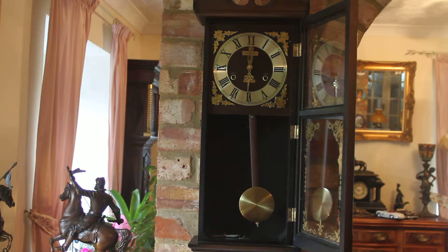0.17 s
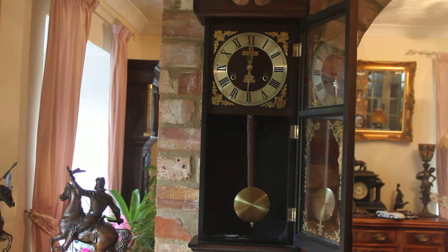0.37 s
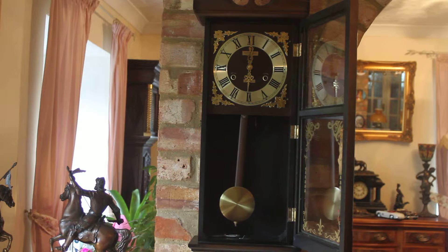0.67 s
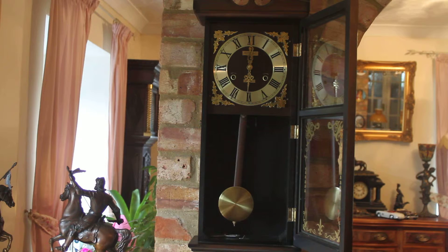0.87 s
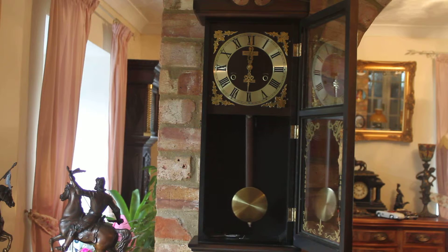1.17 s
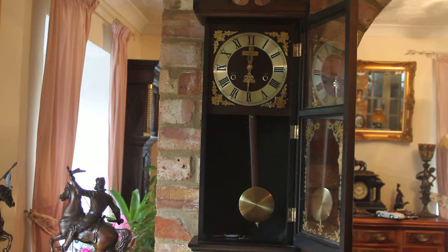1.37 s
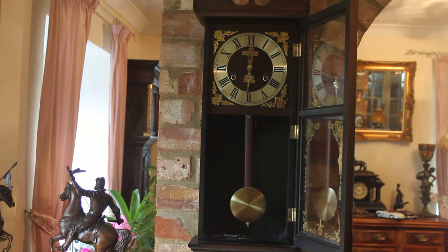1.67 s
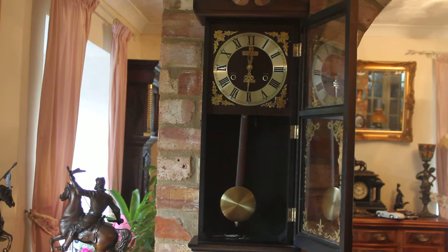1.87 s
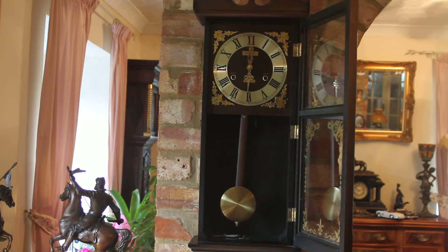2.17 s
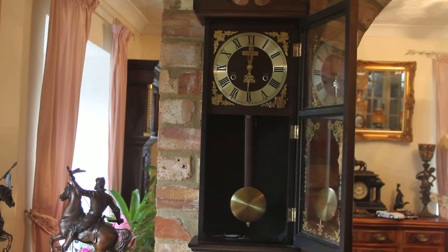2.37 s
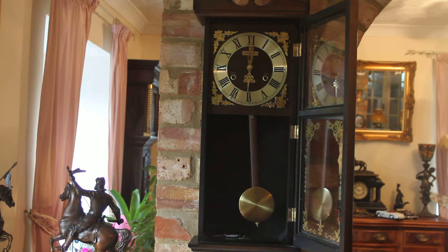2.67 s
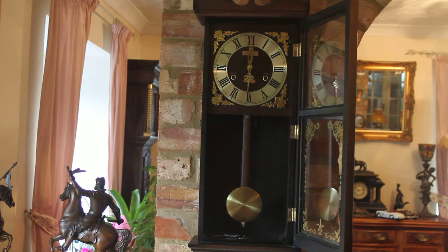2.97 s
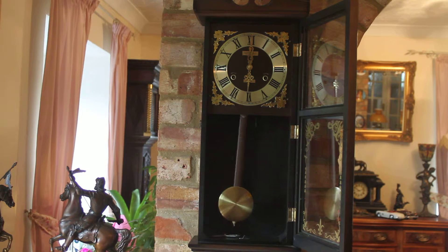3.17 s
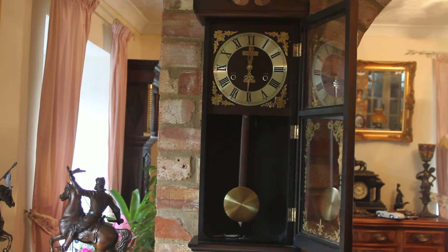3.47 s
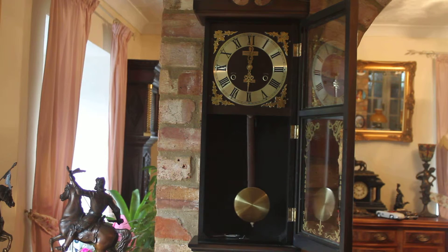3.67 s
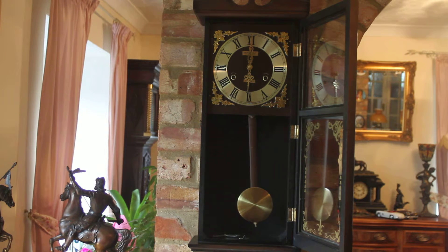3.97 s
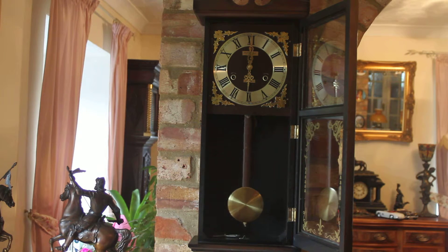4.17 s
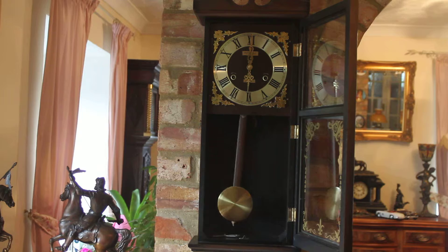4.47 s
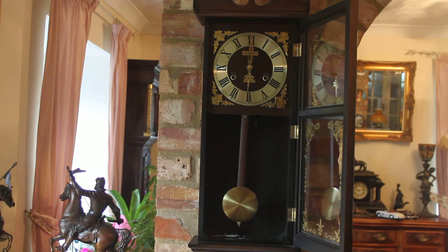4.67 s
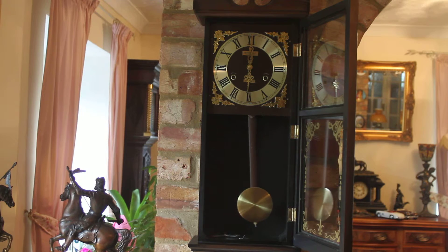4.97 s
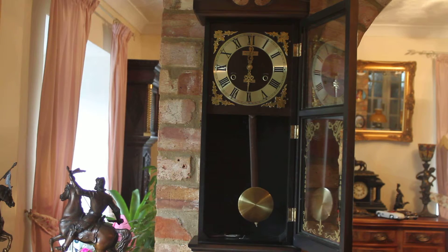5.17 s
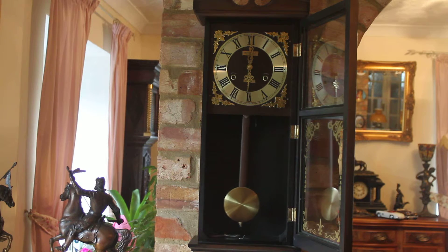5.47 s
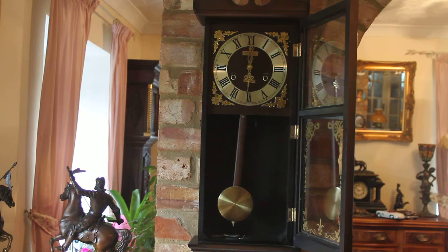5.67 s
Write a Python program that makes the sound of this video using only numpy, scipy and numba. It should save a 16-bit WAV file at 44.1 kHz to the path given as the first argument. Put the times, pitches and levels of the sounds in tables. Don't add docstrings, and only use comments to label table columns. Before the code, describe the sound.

Close, mono capture of an old striking clock indoors. A steel coil gong hums from a previous blow while gears whir, then four evenly spaced hammer blows clang out, with slight hammer rebounds, a thump of the wooden case and a light clack. Fast fluttery whirring fills the gaps, with tiny ticks and very faint high squeaks over soft room air. The gong rings on at the end.

```python
import sys
import numpy as np
from scipy import signal
from scipy.fft import rfft, irfft, next_fast_len
from scipy.io import wavfile
from scipy.ndimage import uniform_filter1d
from numba import njit

SR = 44100
rng = np.random.default_rng(int(sys.argv[2]) if len(sys.argv) > 2 else 0)


def log_audio(samples):
    frames = np.atleast_2d(samples).T
    limited = np.clip(frames, -1, 1)
    pcm = np.round(limited * 32767).astype(np.int16)
    wavfile.write(sys.argv[1], SR, pcm)


def undo_db(level):
    steps = np.asarray(level, float) / 20
    return 10 ** steps


N = 256220

# time in seconds, strength in dB.
HAMMER_BLOWS = [(-3.9469, -3.3), (-2.71881, -6.6), (-1.58144, -9.8), (-0.2891, -0.5), (-0.24782, -19.8),
                (-0.23208, -20.0), (0.997, -0.1), (1.02876, -18.5), (1.03933, -16.0), (2.2238, 0.9),
                (2.2527, -13.1), (2.29892, -14.5), (3.46932, -1.8), (3.47122, -16.7), (3.54087, -18.9),
                (4.791, 0.7), (4.80547, -20.9), (4.88311, -19.8)]
# frequency in Hz, level in dB, t60 in seconds.
COIL_MODES = [(139.95, -65.5, 25.0), (177.54, -52.5, 25.0), (227.24, -40.5, 14.57), (286.74, -56, 22.78),
              (354.26, -51.5, 15.12), (428.67, -39.3, 24.66), (509.68, -27.5, 9.69), (596.67, -25.5, 6.53),
              (689.44, -33.5, 8.45), (786.97, -34.5, 6.63), (891.5, -32, 6.18), (1001.06, -18, 6.33),
              (1114.97, -24, 9.67), (1236.34, -28.5, 6.53), (1360.22, -29.5, 4.99), (1491.48, -27, 4.71),
              (1626.82, -32.3, 7.37), (1765.92, -43.5, 8.48), (1908.66, -37, 5.33), (2052.95, -41, 9.1),
              (2200.22, -34, 7.64), (2348.28, -39.5, 7.0), (2499.09, -35.5, 7.77), (2655.57, -33.5, 8.14),
              (2819.33, -39.5, 7.66), (2992.86, -38, 7.24), (3171.73, -36.5, 4.19), (3359.56, -28, 3.36),
              (3553.08, -34, 2.98), (3751.13, -31, 2.73)]
# frequency in Hz, level in dB, t60 in seconds.
CROSS_MODES = [(404.67, -57.8, 15), (770.77, -51.2, 11), (873.07, -47.2, 15), (980.95, -44.6, 11),
               (1093.5, -43.4, 11), (1213.98, -47.1, 11), (1335.89, -38.5, 11), (1465.27, -48.8, 8),
               (1599.16, -43.0, 4.5), (1736.33, -47.3, 8), (1876.11, -45.3, 15), (2017.29, -56.6, 15),
               (2160.97, -52.9, 15), (2306.9, -39.5, 3.5), (2457.34, -36.8, 2), (2614.99, -46.1, 3.5),
               (2779.94, -47.9, 3.5), (2954.12, -64.5, 15), (3132.85, -53.5, 6), (3320.73, -52.3, 3.5),
               (3513.54, -53.5, 6), (3710.58, -53.4, 8), (3913.64, -50.3, 4.5), (4124.31, -47.8, 4.5),
               (4337.92, -58.9, 11), (4783.33, -53.8, 11), (5010.7, -53.0, 4.5), (5243.82, -55.5, 6),
               (5365.44, -70.0, 15), (5721.91, -56.4, 4.5)]
# frequency in Hz, level in dB, t60 in
# seconds.
UPPER_MODES = [(3955.6, -31.9, 1.43), (4167.2, -21.4, 1.85), (4382.37, -28.6, 1.72), (4604.48, -30.4, 1.1),
               (4830.57, -36.2, 1.71), (5059.83, -32.7, 2.11), (5294.63, -49.0, 4.5), (5534.73, -37.0, 2.33),
               (5776.47, -49.7, 1.96), (6022.39, -42.1, 2.65), (6269.85, -43.4, 2.71),
               (6516.56, -56.4, 1.76), (6764.45, -43.8, 2.01)]
# frequency in Hz, level in dB, t60 in seconds.
TOP_GLINTS = [(7267, -12, 1.0), (8366, -17, 5.0), (8958, -12, 1.3), (9265, -7, 2.2), (9577, -17, 0.79),
              (9889, -10, 2.0), (10210, -8, 0.88), (10540, -1, 0.4), (10870, -5, 0.36),
              (11200, -10, 0.38), (11550, -10, 2.4), (11890, -10, 0.99), (12230, -6, 0.71),
              (12580, -7, 0.54), (12930, -10, 0.53), (13280, 2, 0.86), (13640, -7, 5.0),
              (14000, -9, 0.82), (14360, -11, 0.76), (14710, -24, 3.5), (15110, -4, 0.52),
              (15490, -10, 2.9)]
# blow in seconds, thump in dB, lever drop in seconds, lever level in dB.
STROKES = [
    (.999, 0.5, 1.070, 1.0),
    (2.226, 1.0, 2.287, 1.5),
    (3.471, -1.5, 3.548, 2.0),
    (4.793, -.5, 4.878, 1.5),
]

# engages in seconds, load eases in seconds, stops in seconds,
# pinion chatter in dB, whir in dB.
TRAIN_RUNS = [
    (-.1, .26, .52, -37, -46.5),
    (1.03, 1.47, 1.75, -34.5, -43.5),
    (2.25, 2.73, 2.89, -35.5, -43.5),
    (3.61, 4.0, 4.15, -41, -47),
    (4.94, 5.37, 5.47, -41, -45.5),
    (5.645, 5.67, 5.68, -51, -54),
]
# a tooth meets in seconds, tooth rate there in teeth per second.
PINION_TEETH = [
    (.2714, 59.95),
    (1.3989, 60.91),
    (2.6138, 61.04),
    (3.8796, 60.08),
    (5.2322, 60.33),
]
# frequency in Hz, level in dB.
SPRING_TONE = [(11000, -38), (12600, -24), (13050, -11), (13330, 0), (13550, -4), (13900, -15), (14150, -8),
               (14600, -24), (16000, -38)]
# frequency in Hz, level in dB.
WHIR_TONE = [(300, -12), (1000, -6), (2500, -5.5), (5000, -4), (6300, -11), (8000, -13), (10000, -12),
             (13000, -9), (15500, -13), (16000, -14)]
# frequency in Hz, level in dB.
ROOM_TONE = [(25, -20), (50, -12), (75, -21), (200, -8.5), (600, -7.5), (2000, -9), (6000, -25),
             (12000, -30), (15800, -47)]
# time in seconds, peak in dB, frequency in Hz
TICKS = [(0.6694, -45, 15400), (0.8894, -46, 15500), (1.8417, -38, 10600), (2.2014, -39, 13300),
         (3.1203, -40, 9280), (3.3994, -46, 13300), (4.2994, -43, 9420), (4.3494, -41, 9280),
         (4.6389, -45, 7590), (5.6491, -38, 13300), (5.7394, -47, 13800)]
# time in seconds, pitch in Hz, level in dB.
SQUEAKS = [
    [(0.54, 14910, -71), (0.576, 15290, -63), (0.626, 15718, -63), (0.642, 15544, -60), (0.718, 15298, -66),
     (0.76, 15027, -72)],
    [(0.86, 15070, -72), (0.904, 15599, -64), (0.926, 15255, -65), (0.935, 15113, -72)],
    [(4.2, 14700, -73), (4.25, 14900, -70), (4.295, 15200, -69), (4.33, 14800, -72)],
    [(4.41, 14200, -73), (4.465, 14350, -69), (4.49, 13800, -65), (4.525, 12900, -71), (4.56, 12700, -74)],
]
# start in seconds, level in dB, length in seconds.
PIPS = [
    (.935, -55, .035),
    (3.176, -52, .03),
    (4.667, -54, .03),
    (5.575, -57, .02),
]
# frequency in Hz, level in dB, t60 in seconds.
CASE_MODES = [(205, -34, .3), (335, -38, .25), (480, -28, .2), (640, -32, .15), (880, -25, .15),
              (1180, -26, .12), (1350, -21, .15), (1750, -34, .08)]
# frequency in Hz, level in dB, t60 in seconds.
LEVER_MODES = [(500, -34, .15), (940, -34, .12), (1430, -28, .2), (1550, -30, .16), (1970, -31, .14),
               (2080, -27, .18), (3600, -40, .08), (9200, -50, .08), (11800, -56, .05)]

GLINTS_DB = -42
FLASH_DB, FLASH_S = -6.5, .06
ENGAGE_S, EASE_S, STOP_S = .03, .1, .06
ENGAGE_DB, SAG_DB, COAST_DB, STOPPING_DB = -7, -3, -10, -15
CHATTER_CREST_SHARE, WHIR_CREST_SHARE = .68, .4
REST_CHATTER_DB, REST_WHIR_DB = -73, -61
WHIR_FOLLOWS = .7
FLUTTER_HZ, FLUTTER_DB = 22, 1.3
SLOWING_PER_S2 = 5.0
ROOM_DB, HUM_HZ, HUM_DB = -44.5, 100.0, -60
PIP_HZ = 14150


@njit
def ring(poles, rise, at, kick):
    out = np.zeros(N)
    for m in range(len(poles)):
        z, unheard, fading = 0j, 0j, rise * poles[m]
        for k in range(len(at) - 1):
            z += kick[m, k]
            unheard = (unheard + kick[m, k]) * (at[k] > 0)
            for i in range(at[k], at[k + 1]):
                out[i] += z.imag
                z *= poles[m]
            for i in range(at[k], min(at[k + 1], at[k] + 3000)):
                out[i] -= unheard.imag
                unheard *= fading
    return out


def strike(modes, times, db, rise_s, scatter=0.):
    hz, mode_db, t60 = np.transpose(modes)
    s = 2j * np.pi * hz - np.log(1000) / t60
    at = np.maximum(np.ceil(times * SR), 0).astype(np.int64)
    turn = rng.random(len(hz))[:, None] + scatter * rng.standard_normal((len(at), len(hz))).T
    travel = s[:, None] * (at / SR - times)
    kick = undo_db(mode_db[:, None] + db) * np.exp(travel + 2j * np.pi * turn)
    return ring(np.exp(s / SR), np.exp(-1 / (rise_s * SR)), np.append(at, N), kick)


def colour(x, points):
    hz, db = np.transpose(points)
    size = next_fast_len(N)
    f = np.maximum(np.fft.rfftfreq(size, 1 / SR), 1)
    gain = undo_db(np.interp(np.log(f), np.log(hz), db, left=-60, right=-60))
    y = irfft(rfft(x, size) * gain, size)[:N]
    return y / y.std()


def bursts(times, db, decay_s):
    hits = np.zeros(N)
    np.add.at(hits, (np.asarray(times) * SR).astype(int), undo_db(np.asarray(db)))
    return signal.lfilter([1], [1, -np.exp(-1 / (decay_s * SR))], hits)


def gong():
    times, db = np.transpose(HAMMER_BLOWS)
    coil = strike(COIL_MODES + CROSS_MODES, times, db, rise_s=.004)
    flash = 1 + bursts(np.transpose(STROKES)[0], FLASH_DB, FLASH_S)
    upper = flash * strike(UPPER_MODES, times, db - .3, rise_s=.009)
    glints = np.array(TOP_GLINTS, float)
    glints[:, 2] = np.minimum(glints[:, 2], 2.6 * (9300 / glints[:, 0]) ** 3)
    glitter = undo_db(GLINTS_DB) * strike(glints, times, db, rise_s=.002)
    return coil + upper + glitter


def load(t, start, ease, stop, top_db, rest_db, follows, crest_share):
    crest = start + crest_share * (ease - start)
    s = [start - ENGAGE_S, start, crest, ease, min(ease + EASE_S, stop), stop, stop + STOP_S]
    steps = top_db + follows * np.array([ENGAGE_DB, 0, SAG_DB, COAST_DB, STOPPING_DB])
    return np.interp(t, s, [rest_db, *steps, rest_db])


def flutter(t):
    knots = np.arange(0, t[-1] + 1, 1 / 200)
    wobble = uniform_filter1d(rng.standard_normal(len(knots)), max(int(200 / FLUTTER_HZ), 1))
    return FLUTTER_DB * np.interp(t, knots, wobble / wobble.std())


def pinion(t):
    meets, rate = np.transpose(PINION_TEETH)
    run = np.searchsorted((meets[1:] + meets[:-1]) / 2, t)
    since = t - meets[run]
    teeth = 100 * run + 50 + rate[run] * since - SLOWING_PER_S2 / 2 * since ** 2
    size = undo_db(1.5 * rng.standard_normal(100 * len(meets)))[(teeth + .5).astype(int)]
    return size * np.exp(1.6 * (np.cos(2 * np.pi * teeth) - 1))


def train():
    t = np.arange(N) / SR
    chatter_runs = [load(t, start, ease, stop, chatter, REST_CHATTER_DB, 1, CHATTER_CREST_SHARE)
                    for start, ease, stop, chatter, _ in TRAIN_RUNS]
    whir_runs = [load(t, start, ease, stop, whir, REST_WHIR_DB, WHIR_FOLLOWS, WHIR_CREST_SHARE)
                 for start, ease, stop, _, whir in TRAIN_RUNS]
    chatter_db, whir_db = np.max(chatter_runs, axis=0), np.max(whir_runs, axis=0)
    flutter_db = flutter(t)
    pulse = pinion(t)
    spring = colour((.2 + pulse) * rng.standard_normal(N), SPRING_TONE)
    rustle = colour((1.2 + pulse) * rng.standard_normal(N), WHIR_TONE)
    return undo_db(chatter_db + flutter_db - .8) * spring + undo_db(whir_db + flutter_db / 2 + 6.0) * rustle


def room():
    hum = undo_db(HUM_DB) * np.sin(2 * np.pi * HUM_HZ * np.arange(N) / SR)
    return undo_db(ROOM_DB) * colour(rng.standard_normal(N), ROOM_TONE) + hum


def works():
    t = np.arange(N) / SR
    tick_s, tick_db, _ = np.transpose(TICKS)
    tick_noise = colour(rng.standard_normal(N), [(5000, -24), (8000, 2), (13500, 0), (16000, -8)])
    out = bursts(tick_s, tick_db, .008) * undo_db(-7) * tick_noise
    for squeak in SQUEAKS:
        s, hz, db = np.transpose(squeak)
        fade = np.clip(np.minimum(t - s[0], s[-1] - t) / .015, 0, 1)
        phase = 2 * np.pi * np.cumsum(np.interp(t, s, hz)) / SR
        out = out + fade * undo_db(np.interp(t, s, db) + 3.5) * np.sin(phase)
    for s, db, length in PIPS:
        fade = np.clip(np.minimum((t - s) / .003, (s + length - t) / length), 0, 1)
        out = out + undo_db(db) * fade * np.sin(2 * np.pi * PIP_HZ * t)
    return out


def case():
    blow, thump_db, drop, lever_db = np.transpose(STROKES)
    wood = strike(CASE_MODES, blow, thump_db, rise_s=.004, scatter=.2)
    lever = strike(LEVER_MODES, drop, lever_db, rise_s=.004, scatter=.2)
    boom = colour(rng.standard_normal(N), [(120, -30), (250, -10), (500, -2), (900, 4.5), (1400, 15),
                                           (2600, -10), (8000, -28), (14000, -42)])
    clack = colour(rng.standard_normal(N), [(400, -12), (1000, -8), (1800, 0), (4000, -10),
                                            (9000, -24), (15000, -30)])
    rattle = bursts(blow, thump_db - 21, .022) * boom + bursts(drop, lever_db - 32, .016) * clack
    return wood + lever + rattle


def scene():
    return (gong() + train() + room() + works() + case())[None]


def roll_off(x):
    return signal.sosfilt(signal.butter(12, 15810, fs=SR, output="sos"), x)


def record(dry):
    top_cut = signal.ellip(10, .2, 60, 15740, fs=SR, output="sos")
    mix = signal.sosfilt(top_cut, dry)
    return roll_off(mix)


dry = scene()
out = record(dry)
log_audio(out)
```